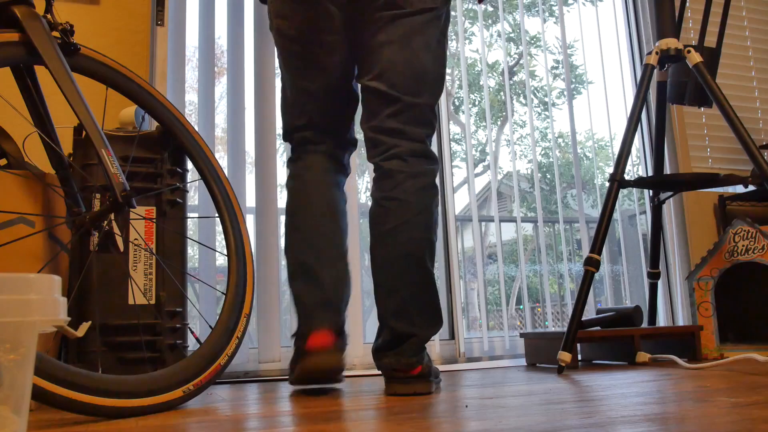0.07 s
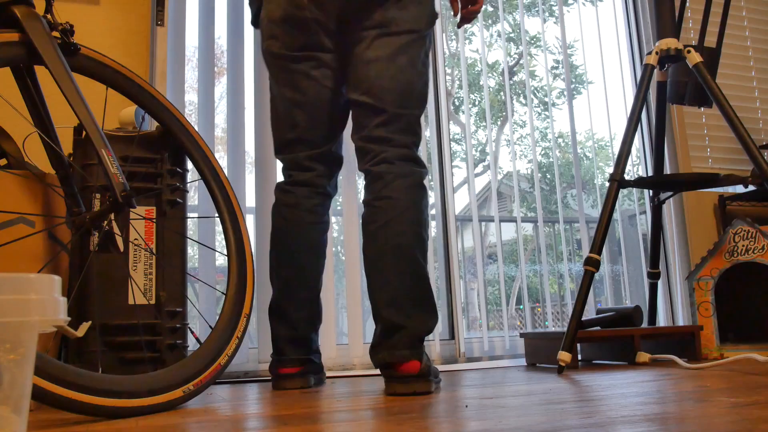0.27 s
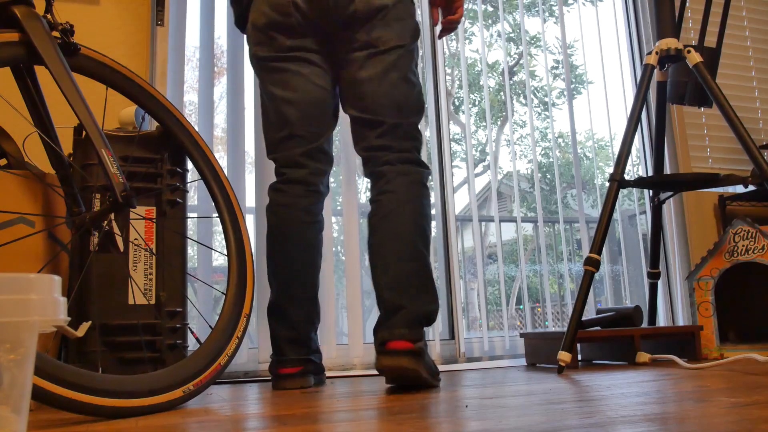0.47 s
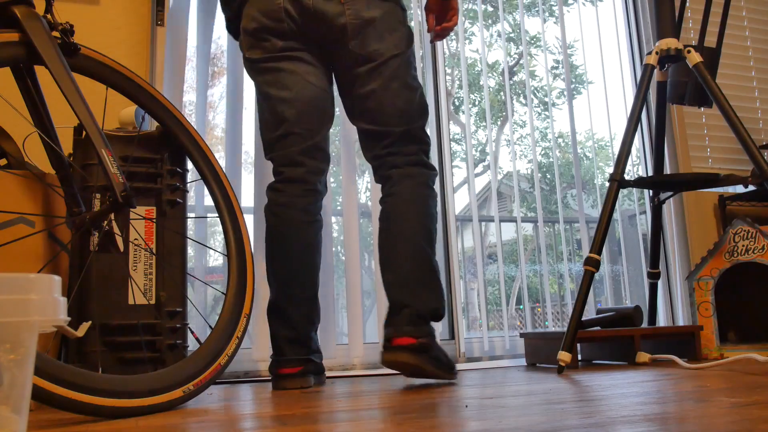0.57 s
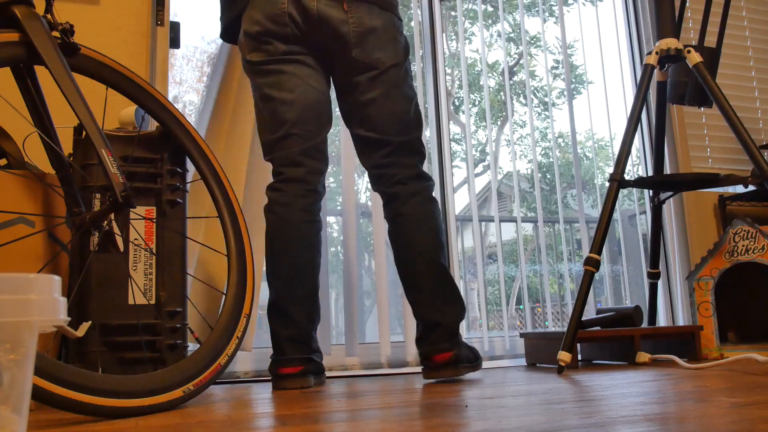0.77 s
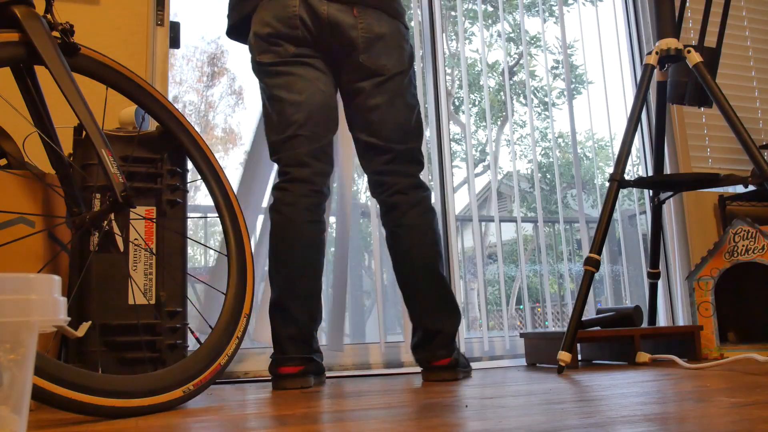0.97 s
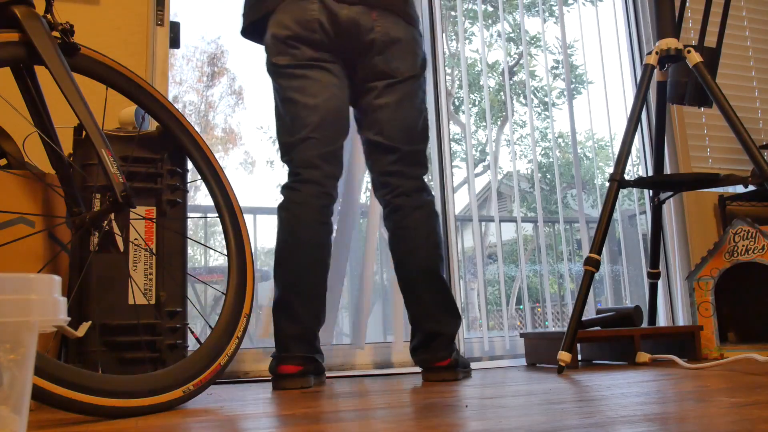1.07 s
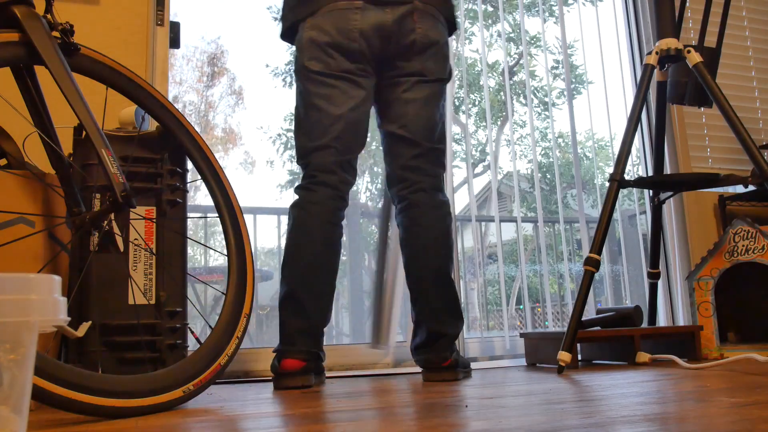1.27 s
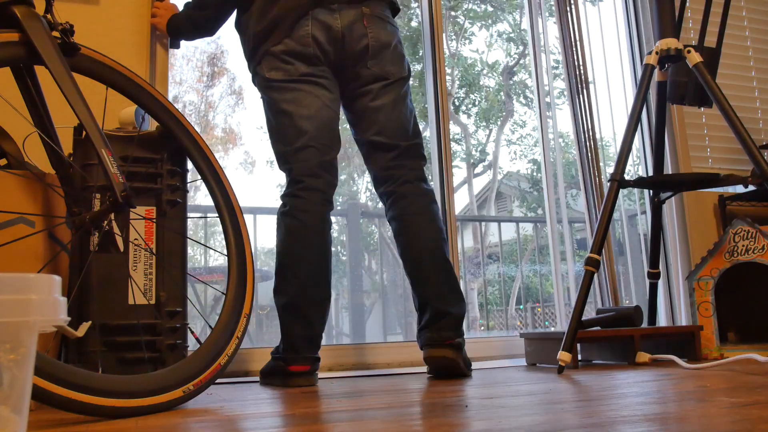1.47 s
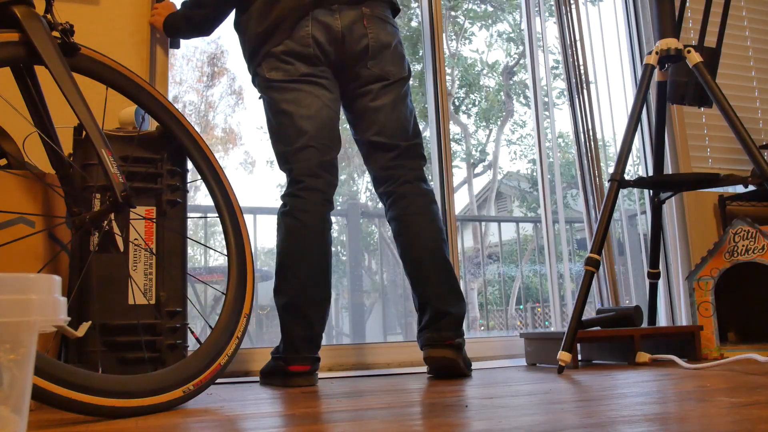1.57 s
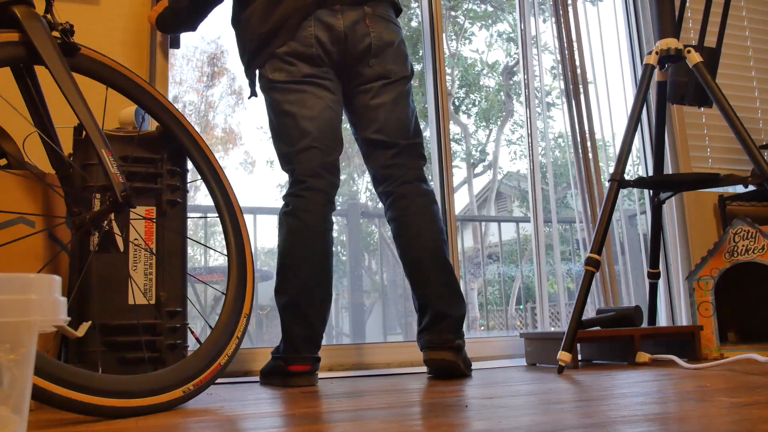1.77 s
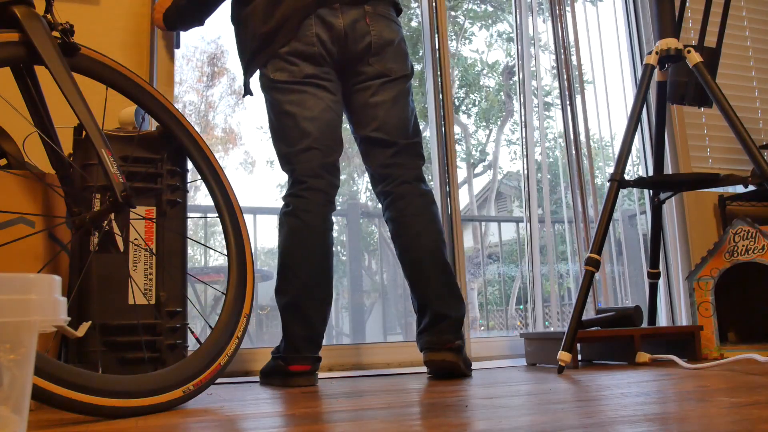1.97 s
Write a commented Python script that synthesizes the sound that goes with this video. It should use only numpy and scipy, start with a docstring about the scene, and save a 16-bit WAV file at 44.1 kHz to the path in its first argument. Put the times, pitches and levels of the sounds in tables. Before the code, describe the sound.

Vertical blinds are pulled aside in a living room: plastic carriers scrape and knock along the rail, slats flutter and slap, then stop abruptly; a sliding door latch snaps and squeaks. Close stereo pickup.

```python
"""Quiet room noise and one soft footfall, then vertical blinds are drawn aside in a living room.
Plastic carriers scrape along the head rail and knock together; slats flutter, slap and thud.
Then the latch of the sliding glass door snaps, the door squeaks in short chirps and begins to roll.
Clicks and noise bursts ring through filters coloured like each object; the squeaks are wavering sines.
Nearby reflections and a shared diffuse tail place most of these sources in the room, in stereo."""
import sys
import numpy as np
from scipy import signal
from scipy.io import wavfile
from scipy.ndimage import uniform_filter1d

SR = 44100
rng = np.random.default_rng(int(sys.argv[2]) if len(sys.argv) > 2 else 0)


def log_audio(samples):
    """Write samples as a 16-bit WAV file to the path given in sys.argv[1]."""
    # one column per channel
    frames = np.atleast_2d(samples).T
    # limit to full scale, then quantise
    limited = np.clip(frames, -1, 1)
    pcm = np.round(limited * 32767).astype(np.int16)
    wavfile.write(sys.argv[1], SR, pcm)


N = 89434
T = np.arange(N) / SR  # time [s]

# Colours are relative: body() brings each filter to energy 1. A mode peaks at twice its strength in power.
# room noise colour: (frequency [Hz], density [dB per Hz])
AIR_COLOUR = [(30, -18.5), (130, 0.5), (780, -5), (1900, -14.5), (9200, -14.5), (14000, -25)]
AIR_DB = -55
# one soft footfall: (time [s], level [dB], decay [s])
FOOTFALL = (0.0914, -47, 0.015)
# footfall colour: (frequency [Hz], density [dB per Hz])
FOOTFALL_COLOUR = [(150, -8), (850, -2), (2200, -31)]
# short faint hum: (time [s], level [dB])
HUM_LEVEL = [(1.44, -49), (1.6, -64), (1.66, -48), (1.73, -52)]
HUM_HZ = 214.3

# room decay: (frequency [Hz], time to fall 60 dB [s])
ROOM_T60 = [(1000, 0.98), (4500, 0.64), (10000, 0.39), (13500, 0.16)]
# likeness of left and right in diffuse sound: (frequency [Hz], likeness [0-1])
SIDE_LIKENESS = [(500, 1), (900, 0.034), (6500, 0.09), (9000, 0.41)]
EARLY_S = 0.0062  # decay of the reflections from nearby glass and walls

# door roller colour: (frequency [Hz], density [dB per Hz])
ROLLER_COLOUR = [(30, -19), (90, -3), (320, 0.5), (550, -15), (3000, -32)]
# door seal hiss colour: (frequency [Hz], density [dB per Hz])
SEAL_COLOUR = [(400, -12), (1400, 2), (2600, -5.5), (6500, 0.5), (15000, -21)]
ROLL_START_S, ROLL_DB, ROLL_RISE_S = 1.939, -42.5, 0.0023
SEAL_DB, SEAL_RISE_S = -35.5, 0.028

# squeaks of the door: (time [s], length [s], level [dB], octave level over the fundamental [dB])
SQUEAKS = [(1.832, 0.041, -28, -2), (1.879, 0.022, -29.5, -17), (1.912, 0.021, -31, -25),
           (1.945, .012, -48, -18)]
# settled pitch, how far flat it starts, settling time constant, rms jitter as a fraction of the pitch
SQUEAK_HZ, SQUEAK_FLAT_HZ, SQUEAK_SETTLE_S, SQUEAK_JITTER = 4240, 113, 0.017, 0.0038

# latch strikes: (time [s], level [dB], decay [s])
LATCH_STRIKES = [(1.635, -47, 0.023), (1.644, -9, 0.0044), (1.6497, -9.5, 0.0017)]
# latch colour: (frequency [Hz], density [dB per Hz])
LATCH_COLOUR = [(40, -30), (170, -20.5), (1100, -8.5), (3200, -7.5), (5000, -2), (7500, -3), (11000, -0.5),
                (13000, -13), (16000, -28)]
# latch modes: (frequency [Hz], width [Hz], strength over the colour [dB])
LATCH_MODES = [(4185, 70, 4), (5180, 180, 1)]
LATCH_TAIL_DB = -16.5

# hanging slats fluttering: (time [s], level [dB])
FLUTTER_LEVEL = [(.185, -55), (.2, -46), (.55, -43.5), (.88, -39), (1.33, -47.5), (1.75, -45), (1.92, -66)]
# flutter colour: (frequency [Hz], density [dB per Hz])
FLUTTER_COLOUR = [(50, -36.5), (100, -7), (170, -1), (330, 4), (800, -2.5), (2500, -26), (12000, -70)]
# slats slapping together: (time [s], level [dB], rise [s], decay [s])
SLAPS = [(0.829, -19, 0.0046, 0.027), (0.853, -24, 0.021, 0.043), (0.988, -19.5, .005, 0.036),
         (1.01, -23.5, 0.0024, 0.016), (1.378, -28, 0.019, 0.034)]
# slap colour: (frequency [Hz], density [dB per Hz])
SLAP_COLOUR = [(100, -61), (300, -9.5), (1600, 2), (3400, -1.5), (9500, -5), (12000, -15), (15500, -26)]
# thuds of bunched slats: (time [s], level [dB], decay [s])
THUDS = [(0.519, -33.5, .009), (0.828, -23.5, 0.01), (0.893, -29.5, 0.015), (1.414, -37.5, 0.014)]
# hollow ring of a thud: (frequency [Hz], width [Hz], strength over the flutter colour [dB])
THUD_MODE = [(502, 42, 14)]

# carriers scraping along the rail: (time [s], level [dB])
SCRAPE_LEVEL = [(.185, -53), (.215, -42), (.223, -25), (.275, -40), (.294, -26.5), (.345, -37.5),
                (.38, -27), (.8, -26.5), (1.04, -23), (1.2, -28.5), (1.36, -32.5), (1.435, -32),
                (1.442, -75)]
# scrape colour: (frequency [Hz], density [dB per Hz])
SCRAPE_COLOUR = [(50, -72), (300, -21), (780, -15.5), (1150, -2.5), (1600, -4), (2000, -4), (3000, -10),
                 (7500, -9), (9400, -5), (11000, -15.5), (15500, -32)]
# rail modes: (frequency [Hz], width [Hz], strength over the scrape colour [dB])
RAIL_MODES = [(1096, 15, 6), (1237, 30, 8), (1612, 34, 4.5), (4975, 85, 6)]
JOLT_DB, RAIL_RIGHT_DB = 0, 1  # share of a thud that shakes the rail; right side over left

# loose carriers rattling: (time [s], level [dB])
RATTLE_LEVEL = [(.355, -58), (.385, -27.5), (.44, -22), (.51, -23), (.64, -27), (.9, -28.5), (1.3, -35),
                (1.433, -35), (1.445, -65)]
# one carrier knocks into the next: (time [s], level [dB], decay [s])
KNOCKS = [(0.3621, -10, 0.0042), (0.4011, -11, 0.0055), (0.4493, -13.5, 0.0043), (0.482, -22, .004),
          (0.491, -18.5, 0.011), (0.5452, -19, 0.0055), (0.599, -19.5, 0.0047), (0.668, -17.5, 0.028),
          (0.7385, -16.5, 0.0051), (0.813, -20, 0.028), (1.446, -24, 0.0032)]
# plastic carrier colour: (frequency [Hz], density [dB per Hz])
CARRIER_COLOUR = [(80, -84), (2000, -14), (2900, -24), (5100, -6.5), (7600, -8), (8700, -0.5), (9700, -1.5),
                  (10800, -7.5), (15500, -28.5)]
# carrier modes: (frequency [Hz], width [Hz], strength over the colour [dB])
CARRIER_MODES = [(4944, 44, 5), (9380, 59, 4)]
# bright crack of a hard knock: (frequency [Hz], density [dB per Hz])
CRACK_COLOUR = [(1200, -27), (5000, 3), (16000, -5.5)]
CRACK_DB = 6.5  # gain on the squared knock force

STOP_S, STOP_DB = 1.439, -4.5  # the blinds' sound drops abruptly here
START_S, EDGE_HZ = 0.036, 15700  # the microphone opens; upper edge of its band


def amp(db):
    """Decibels to gain."""
    return 10 ** (np.asarray(db) / 20)


def unit(x):
    """Scales to rms 1."""
    return x / np.sqrt(np.mean(x ** 2) + 1e-20)


def read(points, hz):
    """Reads a table on a log-frequency axis."""
    f, value = np.transpose(points)
    return np.interp(np.log(hz + 1), np.log(f + 1), value)


def level(points):
    """Gain over time from (time [s], level [dB]), practically silent outside the points."""
    return amp(np.interp(T, *np.transpose(points), left=-120, right=-120))


def burst(start, db, decay, rise):
    """Envelope of a blow: a linear rise and an exponential fall."""
    t = T - start
    return amp(db) * np.clip(t / rise, 0, 1) * np.exp(-np.maximum(t - rise, 0) / decay)


def grains(per_s, spread_db):
    """Random tiny clicks of uneven size and either sign, rms 1."""
    spread = np.minimum(rng.exponential(1, N), 4)
    size = amp(spread_db * spread) * rng.choice([-1, 1], N)
    return unit(size * (rng.random(N) < per_s / SR))


def body(x, colour, modes=(), size=8192):
    """Rings both sides through a causal filter of energy 1: a broad colour with narrow modes on top."""
    hz = abs(np.fft.fftfreq(size, 1 / SR))
    peaks = 1 + sum(2 * amp(db) ** 2 / (1 + (2 * (hz - f) / width) ** 2) for f, width, db in modes)
    log_gain = np.log(amp(read(colour, hz)) * np.sqrt(peaks))
    # minimum phase: the ring starts at once
    response = np.exp(np.conj(signal.hilbert(log_gain)))
    ring = np.fft.ifft(response).real[:size // 2]
    ring = ring / np.linalg.norm(ring)
    return signal.fftconvolve(x, ring[None], axes=1)[:, :N]


def diffuse(t60=None, count=N, size=256):
    """Two-sided noise, its likeness set by frequency, optionally dying away band by band."""
    hz, t, bands = signal.stft(rng.standard_normal((2, count)), SR, nperseg=size)
    same = np.clip(read(SIDE_LIKENESS, hz), 0, .985)[:, None]
    bands[1] = same * bands[0] + np.sqrt(1 - same ** 2) * bands[1]
    if t60:
        bands = bands * amp(-60 * t / read(t60, hz)[:, None])
    return signal.istft(bands, SR, nperseg=size)[1][:, :count]


def room(x, early_db, tail_db, count=6, size=2048):
    """Each click takes one of count places with its own close reflections; all share the room's tail."""
    place = rng.integers(0, count, N)
    tail = unit(diffuse(ROOM_T60, count=SR) * np.minimum(T[:SR] / EARLY_S, 1)) / np.sqrt(SR)
    out = x + amp(tail_db) * signal.fftconvolve(x[None], tail, axes=1)[:, :N]
    for k in range(count):
        early = unit(diffuse(count=size) * np.exp(-T[:size] / EARLY_S)) / np.sqrt(size)
        from_place = (x * (place == k))[None]
        out += amp(early_db) * signal.oaconvolve(from_place, early, axes=1)[:, :N]
    # early and tail levels are relative to the direct sound; the sum keeps its power
    return out / np.sqrt(1 + amp(early_db) ** 2 + amp(tail_db) ** 2)


def background():
    """Steady diffuse room noise, one soft footfall as a noise burst and a short faint sine hum."""
    air = body(diffuse() * amp(AIR_DB), AIR_COLOUR)
    footfall = body(diffuse() * burst(*FOOTFALL, rise=0.005), FOOTFALL_COLOUR)
    hum = level(HUM_LEVEL) * np.sqrt(2) * np.sin(2 * np.pi * HUM_HZ * T)
    return air + footfall + hum


def door():
    """The rollers rumble as diffuse low noise and the seal hisses as dense clicks in the room."""
    since_roll = T - ROLL_START_S
    rumble = diffuse() * amp(ROLL_DB) * np.clip(since_roll / ROLL_RISE_S, 0, 1)
    hiss = grains(per_s=5000, spread_db=0.5) * amp(SEAL_DB) * np.clip(since_roll / SEAL_RISE_S, 0, 1)
    return body(rumble, ROLLER_COLOUR) + body(room(hiss, early_db=0, tail_db=6.0), SEAL_COLOUR)


def squeaks():
    """The door chirps on one rising, wavering pitch with its octave; the right side is first and louder."""
    since_first = np.maximum(T - SQUEAKS[0][0], 0)
    hz = SQUEAK_HZ - SQUEAK_FLAT_HZ * np.exp(-since_first / SQUEAK_SETTLE_S)
    wobble = unit(uniform_filter1d(rng.standard_normal(N), size=120))
    phase = 2 * np.pi * np.cumsum(hz * (1 + SQUEAK_JITTER * wobble)) / SR
    out = np.zeros(N)
    for start, length, db, octave_db in SQUEAKS:
        u = np.clip((T - start) / length, 0, 1)
        swell = 2 * np.sqrt(2 * u * (1 - u))  # rounded rise and fall
        out += amp(db) * swell * (np.sin(phase) + amp(octave_db) * np.sin(2 * phase))
    left, right = room(out, early_db=-16, tail_db=-11, count=1)
    # the left side lags by two samples
    return amp([[-2], [2]]) * np.array([np.roll(left, 2), right])


def latch():
    """The bolt ticks, snaps over and strikes again; noise scatters to both sides and dies in the room."""
    strike = sum(burst(*row, rise=.0002) for row in LATCH_STRIKES)
    crack = strike * (amp(-10) * rng.standard_normal(N) + amp(1) * diffuse())
    # the tail begins at the snap
    snap = round(LATCH_STRIKES[1][0] * SR)
    tail = np.pad(diffuse(ROOM_T60), ((0, 0), (snap, 0)))[:, :N]
    return body(crack + amp(LATCH_TAIL_DB) * tail, LATCH_COLOUR, LATCH_MODES)


def thumps():
    """Force of the thudding slats over time."""
    return sum(burst(*row, rise=.003) for row in THUDS)


def slats():
    """Slats flutter in sparse clicks, slap in dense clusters, and thud when a bunch swings together."""
    slap_force = sum(burst(s, db, decay, rise) for s, db, rise, decay in SLAPS)
    slaps = grains(per_s=4800, spread_db=1.3) * slap_force
    flutter = grains(per_s=1500, spread_db=4.0) * level(FLUTTER_LEVEL)
    thud = body(diffuse() * thumps(), FLUTTER_COLOUR, THUD_MODE)
    slaps = body(room(slaps, early_db=1, tail_db=-8), SLAP_COLOUR)
    flutter = body(room(flutter, early_db=-1.5, tail_db=-12), FLUTTER_COLOUR)
    return slaps + flutter + thud


def rail():
    """Tiny slips of the carriers ring the head rail, a little to the right; each thud jolts it."""
    slips = grains(per_s=2500, spread_db=2.0) * (level(SCRAPE_LEVEL) + amp(JOLT_DB) * thumps())
    lean = amp(np.array([[-.5], [.5]]) * RAIL_RIGHT_DB)
    return body(room(slips, early_db=8, tail_db=-2.5), SCRAPE_COLOUR, RAIL_MODES) * lean


def carriers():
    """Carriers chatter in uneven clumps and knock into each other; the hardest knocks crack brightly."""
    clumps = amp(2.8 * unit(uniform_filter1d(rng.standard_normal(N), size=330)))
    chatter = grains(per_s=5500, spread_db=1.5) * unit(clumps) * level(RATTLE_LEVEL)
    force = sum(burst(*row, rise=.002) for row in KNOCKS)
    knocks = room(force * rng.standard_normal(N), early_db=1, tail_db=-3.0, count=2)
    # squared force favours the hard knocks
    crack = body(diffuse() * amp(CRACK_DB) * force ** 2, CRACK_COLOUR)
    chatter = room(chatter, early_db=-2.0, tail_db=-4.5)
    return body(chatter + knocks, CARRIER_COLOUR, CARRIER_MODES) + crack


def scene():
    """Blinds, then the door, over the quiet room."""
    blinds = (rail() + carriers() + slats()) * amp(STOP_DB * (T > STOP_S))
    return blinds + latch() + squeaks() + door() + background()


def record(dry):
    """The stereo microphone opens after a short silence, clips hard at 0.9 and is low-passed."""
    x = np.clip(dry * (T > START_S), -.9, .9)
    lowpass = signal.firwin(255, EDGE_HZ, window=("kaiser", 9), fs=SR)
    return signal.oaconvolve(x, lowpass[None], "same")


dry = scene()
out = record(dry)
log_audio(out)
```